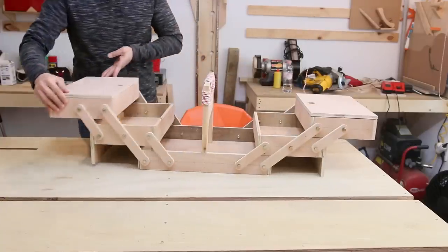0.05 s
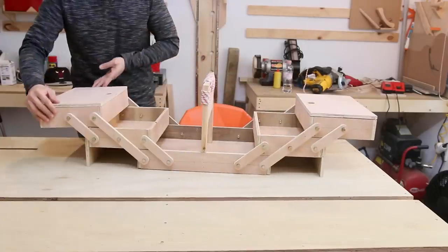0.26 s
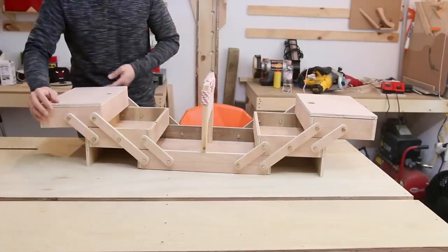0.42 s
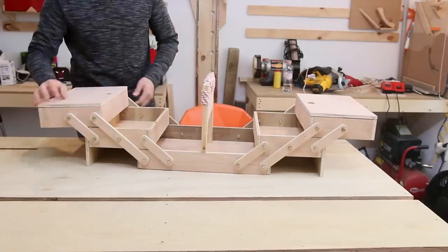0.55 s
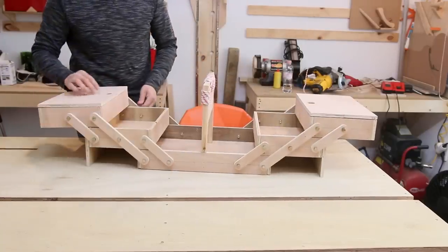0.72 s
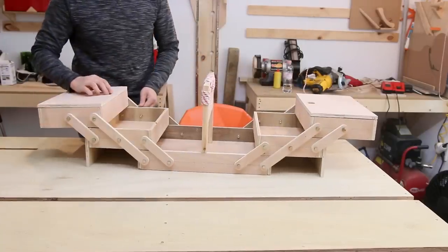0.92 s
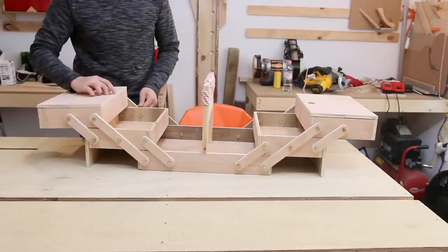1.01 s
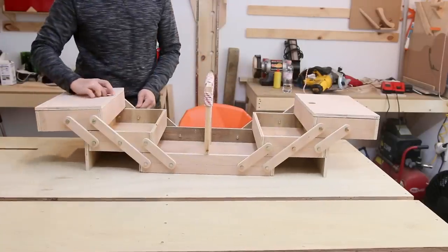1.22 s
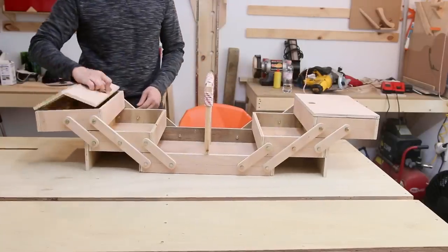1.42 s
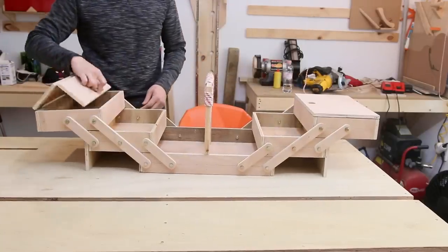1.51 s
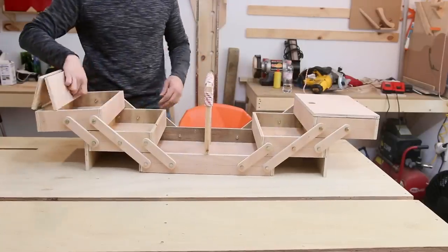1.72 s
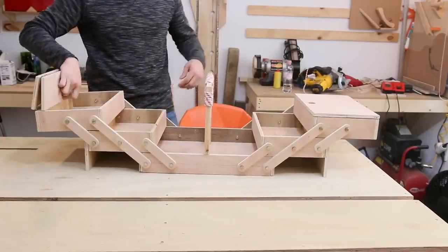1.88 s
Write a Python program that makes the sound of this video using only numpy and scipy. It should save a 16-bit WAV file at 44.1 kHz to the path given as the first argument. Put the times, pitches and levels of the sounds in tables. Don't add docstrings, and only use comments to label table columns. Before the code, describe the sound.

Hollow wood-on-wood clatter of folding toolbox trays, followed by soft hand taps and a rattling lid.

```python
import sys
import numpy as np
from scipy import signal
from scipy.fft import rfft, irfft, next_fast_len
from scipy.io import wavfile
from scipy.ndimage import map_coordinates

SR = 44100
rng = np.random.default_rng(int(sys.argv[2]) if len(sys.argv) > 2 else 0)


def volts(x):
    e = np.asarray(x, float) / 20
    return 10 ** e


def put_to_file(sound):
    columns = np.atleast_2d(sound).T
    safe = np.clip(columns, -1, 1)
    whole_steps = np.round(safe * 32767)
    wavfile.write(sys.argv[1], SR, whole_steps.astype(np.int16))


N = 85995

# pitch_hz, level_db
TRAY_TONES = [(272, -10), (355, -5.5), (440, -9.5), (497, -2.5), (650, -4), (755, -2), (850, -1), (960, -2),
              (1120, -2), (1270, -3), (1655, -1), (1900, -0.5), (2450, 1), (3600, -5)]
TRAY_CYCLES = 25.3
RUB_ROOM_DB, TAP_ROOM_DB = -1, -2.5


def unit(x):
    return x / np.sqrt(np.mean(x ** 2) + 1e-20)


def peak(x):
    return x / np.abs(x).max()


def along(points, hz):
    f, v = np.transpose(points)
    return np.interp(np.log(hz + 1), np.log(f + 1), v)


def level(rows):
    s, db = np.transpose(rows)
    return volts(np.interp(np.arange(N) / SR, s, db))


def filtered(x, response):
    n = x.shape[-1]
    m = next_fast_len(n + SR // 2)
    return irfft(rfft(x, m) * response(np.fft.rfftfreq(m, 1 / SR)), m)[..., :n]


def flutter(per_s, points):
    return map_coordinates(rng.standard_normal(points), [np.arange(N) * per_s / SR])


def spread(pair):
    # pitch_hz, likeness (0 to 1)
    likeness = [(100, 0.93), (350, 0.96), (700, .9), (1400, 0.72), (2800, 0.11), (6000, 0.027)]

    def turn(hz):
        return np.arccos(np.clip(along(likeness, hz), -1, 1)) / 2

    mid, side = filtered(pair, lambda hz: np.array([np.cos(turn(hz)), np.sin(turn(hz))]))
    return np.array([mid + side, mid - side])


def room(x, wet_db):
    # pitch_hz, time_s
    decay = [(150, 0.45), (400, 0.35), (1500, 0.28), (4000, 0.23), (10000, 0.18)]
    # pitch_hz, level_db
    answer = [(150, -2), (300, -6), (600, -1), (1500, 0.5), (4000, 2.5), (10000, 0.5)]
    count, fill_s = SR // 3, 0.0036
    hz, t, z = signal.stft(rng.standard_normal((2, count)), SR, nperseg=256)
    fade_db = along(answer, hz)[:, None] - 60 * t / along(decay, hz)[:, None]
    tail = signal.istft(z * volts(fade_db), SR, nperseg=256)[1][:, :count]
    tail = tail * (1 - np.exp(-(np.arange(count) / SR / fill_s) ** 2))
    wet = signal.fftconvolve(x[None], spread(tail / np.linalg.norm(tail[0])), axes=1)
    return np.pad(x, (0, count - 1)) + volts(wet_db) * wet


def ring(modes, t, corner_hz, spot_hz, spot_db=9, attack_s=0.0007):
    hz, db, t60 = np.transpose(modes)[..., None]
    spot_width, scatter_db = 0.11, 1.5
    near_db = spot_db * np.exp(-(np.log(hz / spot_hz) / spot_width) ** 2)
    gain = volts(db + near_db + scatter_db * rng.standard_normal(hz.shape))
    gain = gain * rng.choice([-1, 1], hz.shape) / (1 + (hz / corner_hz) ** 2)
    tones = gain * volts(-60 * t / t60) * np.sin(2 * np.pi * hz * t)
    return np.sum(tones, axis=0) * (1 - np.exp(-t / attack_s))


def rasp(t, t60, rise_s, response):
    return filtered(rng.standard_normal(len(t)), response) * volts(-60 * t / t60) * (1 - np.exp(-t / rise_s))


def add(out, s, x):
    part = out[:, round(s * SR):][:, :x.shape[1]]
    part += x[:, :part.shape[1]]


def contacts(rows, wood, snap, cycles, wet_db, attack_s):
    out, t = np.zeros((2, N)), np.arange(SR // 8) / SR
    modes = [(hz, mode_db, cycles / hz) for hz, mode_db in wood]
    for s, db, corner_hz, crack_db, spot_hz in rows:
        body = peak(ring(modes, t, corner_hz, spot_hz, attack_s=attack_s))
        crack = peak(rasp(t, 0.037, 0.0022, lambda hz: volts(along(snap, hz))))
        add(out, s, room(volts(db - 3.5) * body + volts(crack_db + 3.5) * crack, wet_db))
    return out


def sliding(stroke, colour):
    grains_per_s, grain_spread_db, smooth_share = 2500, 4, 0.97
    count = int(grains_per_s * N / SR)
    when, size = rng.random(count), rng.standard_normal((2, count))
    strength = volts(grain_spread_db * size[0]) * np.sign(size[1])
    grains = np.bincount((when * N).astype(int), strength, N)
    drive = smooth_share * rng.standard_normal(N) + (1 - smooth_share) * unit(grains)

    def panels(f):
        total = 0
        for hz, _ in TRAY_TONES:
            damping = 1j * f * 4 / (TRAY_CYCLES / hz)
            total = total + damping / (hz * hz - f * f + damping)
        return 8.5 + 1.7 * np.abs(total)

    rub = unit(filtered(drive, lambda hz: volts(along(colour, hz)) * panels(hz)))
    pressure = volts(1.4 * flutter(40, 90) + 0.5)
    return room(level(stroke) * pressure * rub, RUB_ROOM_DB)[:, :N]


def air():
    # pitch_hz, level_db
    air_colour = [(25, -29.5), (45, -22), (70, -27.5), (150, -7), (200, -17.5), (500, -9), (1500, -20.5),
                  (11800, -31), (12300, -56.5)]
    noise = filtered(rng.standard_normal((2, N)), lambda hz: volts(along(air_colour, hz)))
    return volts(-73) * unit(spread(noise))


def bench():
    # start_s, level_db
    booms = [
        (0.256, -37),
        (0.29, -46),
        (1.30, -65.5),
        (1.758, -61.5),
        (1.86, -64.5),
    ]
    # pitch_hz, level_db, time to die by 60 dB in s
    bench_tones = [(155, 9.5, 0.31), (157, -17.5, 0.56), (43.5, -28.5, 0.49), (85, -27, 0.9),
                   (98, -26.5, 0.82)]
    rise_s = 0.029
    out, t = np.zeros((2, N)), np.arange(SR)[None] / SR
    for s, db in booms:
        boom = 0
        for hz, mode_db, t60 in bench_tones:
            boom = boom + volts(mode_db - 60 * t / t60) * np.sin(2 * np.pi * hz * (t + s))
        add(out, s, volts(db) * (1 - np.exp(-t / rise_s)) ** 2 * boom)
    return out


def hinge():
    # time_s, level_db
    hinge_rub = [(1.46, -100), (1.5, -77.5), (1.55, -83), (1.6, -73), (1.66, -87.5), (1.72, -85)]
    # centre_hz, width_hz, level_db
    squeak_bands = [(4150, 500, 0), (6200, 1500, -9), (2400, 1400, -4)]

    def bands(f):
        return sum(volts(db) * np.exp(-((f - c) / w) ** 2) for c, w, db in squeak_bands)

    rub = unit(filtered(rng.standard_normal(N), bands))
    return room(level(hinge_rub) * volts(3.5 * flutter(60, 130)) * rub, RUB_ROOM_DB)[:, :N]


def fitting():
    # start_s, level_db, pitch_hz of the spot
    ticks = [
        (0.602, -64, 5900),
        (0.653, -58, 3900),
        (0.658, -64.5, 2850),
        (.664, -54, 3500),
        (0.666, -58.5, 2000),
        (1.607, -72.5, 4000),
    ]
    # pitch_hz, level_db, time to die by 60 dB in s
    metal_tones = [(1420, -3, .05), (1465, -6, .04), (2000, 3, .04), (2800, -3, .02), (3300, -6, .014),
                   (3900, -5, .012), (5850, -5, .02)]
    out, t = np.zeros((2, N)), np.arange(SR // 8) / SR
    for s, db, spot_hz in ticks:
        noise = peak(rasp(t, 0.04, 0.00039, lambda f: f / (f + 1200) / (1 + (f / 4500) ** 4)))
        tick = peak(ring(metal_tones, t, 11000, spot_hz)) + 0.99 * noise
        add(out, s, volts(db - 5) * room(tick, TAP_ROOM_DB))
    return out


def hand_stroke():
    # time_s, level_db
    stroke_path = [(.5, -71.5), (1.0, -99), (1.1, -66), (1.17, -62), (1.25, -58.5), (1.33, -55),
                   (1.39, -68.5), (1.44, -77), (1.5, -68.5), (1.57, -75.5), (1.65, -67.5), (1.72, -81.5),
                   (1.95, -57)]
    # pitch_hz, level_db
    skin_colour = [(76, -60), (150, -10), (200, -30.5), (267, -3.5), (900, -10.5), (2510, -20.5),
                   (11500, -36.5), (14000, -48.5)]
    return sliding(stroke_path, skin_colour)


def fingers():
    # start_s, level_db, pitch_hz of the spot
    taps = [(0.609, -54, 333), (.623, -60.5, 500), (.630, -62.5, 395), (.715, -59.5, 704),
            (0.723, -58, 860), (.729, -59.5, 845), (.865, -59.5, 710), (0.875, -49.5, 303),
            (.886, -57.5, 328), (0.895, -51, 300), (.903, -56.5, 936), (.916, -61, 450), (.926, -55.5, 495),
            (0.934, -55, 270), (1.015, -56, 289), (1.022, -55.5, 321), (1.032, -58, 452),
            (1.321, -53.5, 269), (1.337, -54, 443), (1.468, -53.5, 1100), (1.478, -55, 640),
            (1.492, -52.5, 487), (1.517, -55.5, 481), (1.537, -62, 575), (1.644, -60.5, 440)]
    # multiple of the spot's pitch, level_db
    tap_parts = [(1, 4), (1.45, -5), (2.1, -25), (2.9, -12.5)]
    tap_cycles, scuff_db, scuff_hz = 15.7, -11, 1100
    out, t = np.zeros((2, N)), np.arange(SR // 8) / SR
    for s, db, hz in taps:
        modes = [(hz * k, part_db, tap_cycles / hz) for k, part_db in tap_parts]
        thud = peak(ring(modes, t, 2400, hz, spot_db=1.5, attack_s=0.0024))
        scuff = peak(rasp(t, 0.092, 0.0028, lambda f: 1 / (1 + (f / scuff_hz) ** 3)))
        add(out, s, volts(db) * room(thud + volts(scuff_db) * scuff, TAP_ROOM_DB))
    nail_s, nail_db, nail_hz = 1.3122, -53, 20000
    nail = peak(rasp(t, 0.005, 0.00097, lambda f: f / (nail_hz + f)))
    add(out, nail_s, volts(nail_db) * room(nail, TAP_ROOM_DB - 8))
    return out


def lid_fall():
    # start_s, level_db, hardness as corner_hz, crack_db, pitch_hz of the panel struck
    lid_knocks = [(1.737, -33.5, 1510, -47, 760), (1.743, -26, 2000, -38.5, 760),
                  (1.749, -28.5, 2180, -50.5, 1810), (1.756, -30.5, 1500, -47, 490),
                  (1.771, -44, 1490, -54, 1510), (1.785, -29.5, 890, -69, 419),
                  (1.80, -42, 1160, -49, 1100), (1.822, -33.5, 1510, -49.5, 650),
                  (1.835, -36, 1190, -51, 660), (1.857, -34.5, 880, -57.5, 413),
                  (1.892, -56, 900, -73.5, 554), (1.904, -43, 700, -50.5, 392), (1.912, -39, 700, -65, 780),
                  (1.936, -38, 550, -54, 745)]
    # pitch_hz, level_db
    lid_tones = [(225, -13), (410, -2.5), (478, -5), (585, -6), (700, -11), (757, -2), (1010, -6),
                 (1135, -8.5), (1245, -22.5), (1450, -0.5), (1610, 7), (1860, 1), (2300, 3.5), (3080, -1)]
    # pitch_hz, level_db
    lid_snap = [(300, -40.5), (900, 16.5), (2000, -0.5), (4000, -5), (7000, -15.5), (10000, -23),
                (13000, -33), (16000, -32.5)]
    return contacts(lid_knocks, lid_tones, lid_snap, cycles=27.4, wet_db=0.5, attack_s=0.0012)


def tray_swing():
    # time_s, level_db
    swing_path = [(0, -59), (.04, -63.5), (.12, -67), (.22, -68), (.3, -84.5), (.4, -110)]
    # pitch_hz, level_db
    arm_colour = [(80, -37), (200, -22), (270, -1.5), (470, -2), (1100, -7), (3000, -14.5), (11500, -27),
                  (13500, -48.5)]
    return sliding(swing_path, arm_colour)


def tray_knocks():
    # start_s, level_db, hardness as corner_hz, crack_db, pitch_hz of the panel struck
    tray_hits = [(.2252, -17.5, 1300, -41, 836), (.231, -14.5, 900, -35.5, 1110),
                 (.236, -14.5, 700, -40, 313), (.2435, -9.5, 947, -38.5, 500),
                 (.254, -17.5, 1430, -39, 1640), (.264, -14.5, 810, -45.5, 365),
                 (.2735, -10, 1780, -27, 900), (.2855, -5.5, 1010, -33, 462),
                 (.2955, -11, 1620, -36.5, 750), (.304, -16.5, 1560, -41.5, 1100),
                 (.316, -21.5, 1190, -41.5, 646), (.326, -21, 1410, -43.5, 445),
                 (.3355, -16, 1300, -43, 480), (.347, -24, 1200, -49, 824), (.369, -23.5, 1000, -46, 520)]
    # pitch_hz, level_db
    tray_snap = [(300, -30.5), (800, 13), (2000, 2), (2900, -3), (3600, -6.5), (5500, -15.5), (8000, -25.5),
                 (16000, -40)]
    return contacts(tray_hits, TRAY_TONES, tray_snap, TRAY_CYCLES, wet_db=-2, attack_s=0.0007)


def scene():
    # pitch_hz, level_db
    left_louder = [(250, 0), (700, 1.4), (1500, 1.2), (4000, 3), (12000, 1.5)]
    low_cut_hz, right_lag_s = 141, 1 / SR
    box = tray_knocks() + tray_swing() + lid_fall() + fingers() + hand_stroke() + fitting() + hinge()

    def placed(hz):
        thin = (1j * hz / (low_cut_hz + 1j * hz)) ** 3
        balance = volts(np.outer([.5, -.5], along(left_louder, hz)))
        lag = np.exp(np.outer([0, -1j], 2 * np.pi * hz * right_lag_s))
        return thin * balance * lag

    return filtered(box, placed) + bench() + air()


def roll_off(x):
    return signal.sosfilt(signal.butter(12, 15710, fs=SR, output="sos"), x)


def record(dry):
    top_hz = 15740
    mix = filtered(dry, lambda hz: hz < top_hz)
    return roll_off(mix)


dry = scene()
out = record(dry)
put_to_file(out)
```